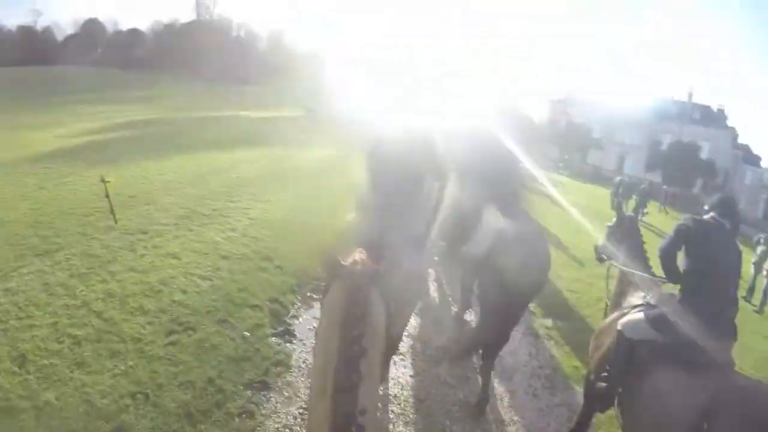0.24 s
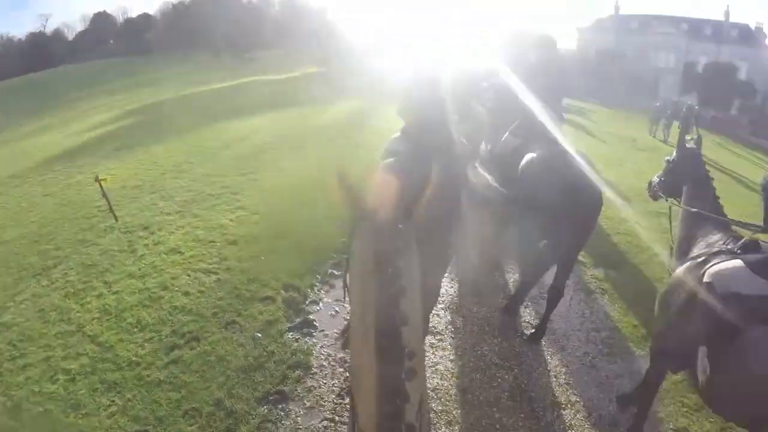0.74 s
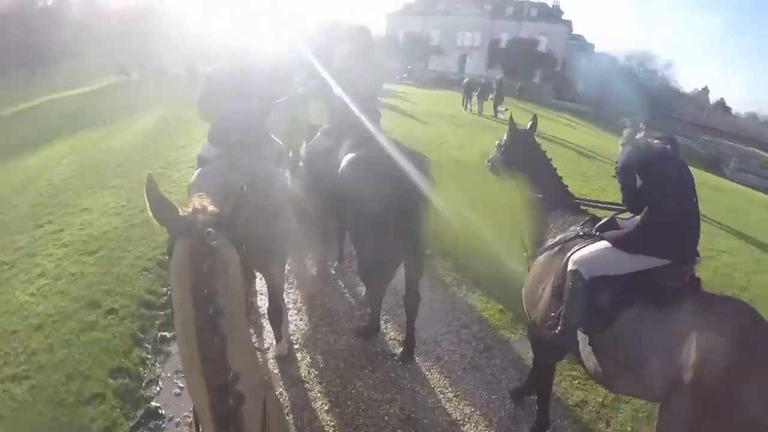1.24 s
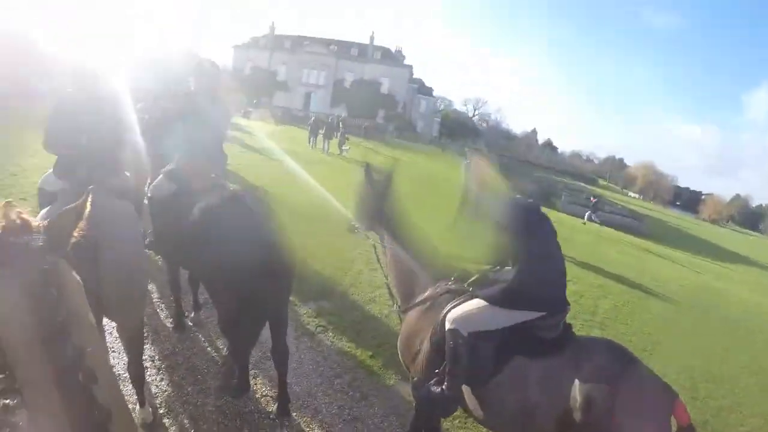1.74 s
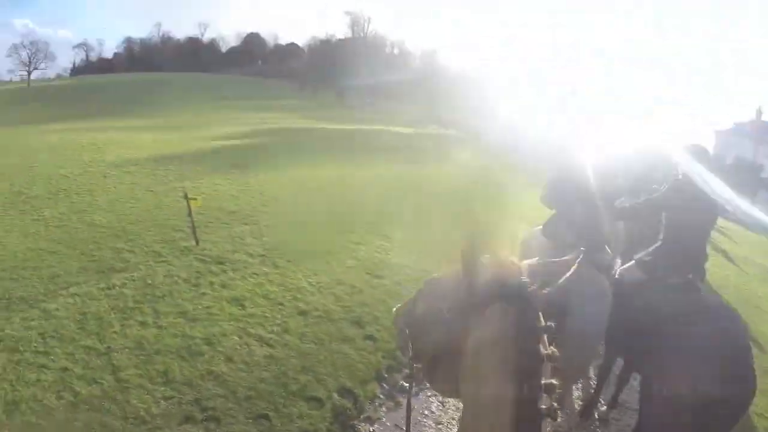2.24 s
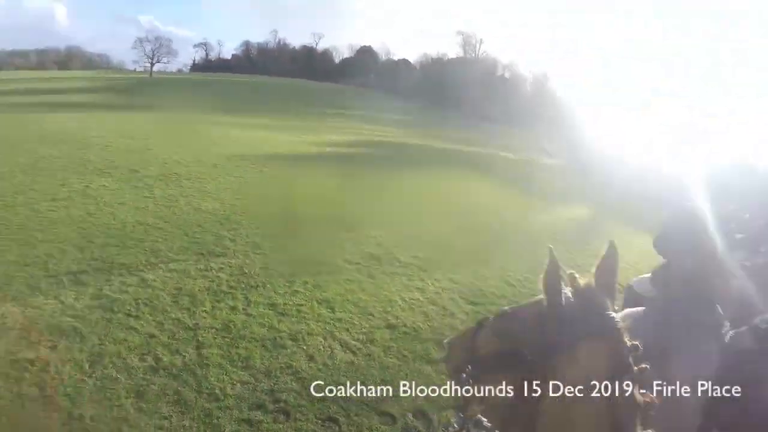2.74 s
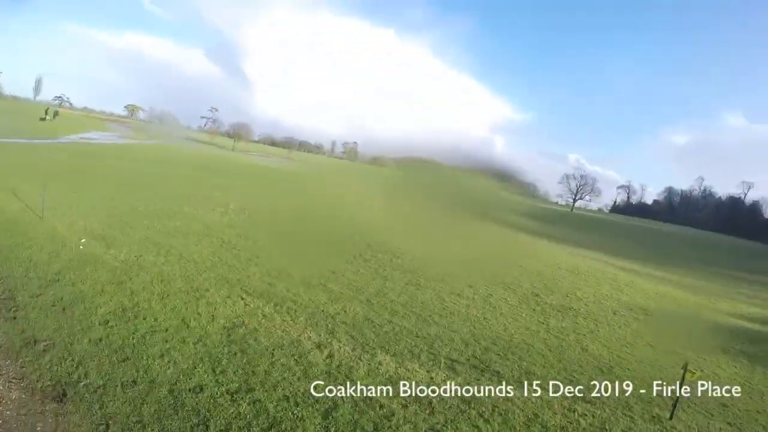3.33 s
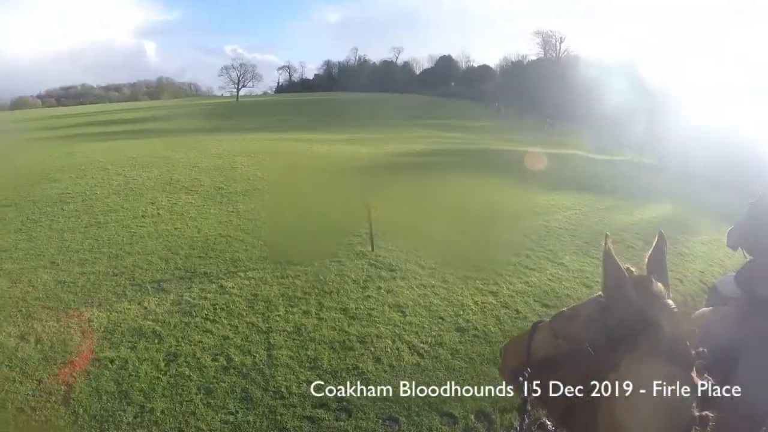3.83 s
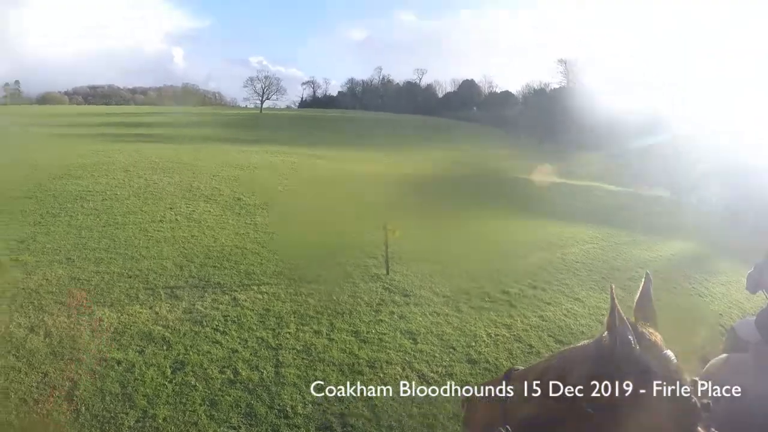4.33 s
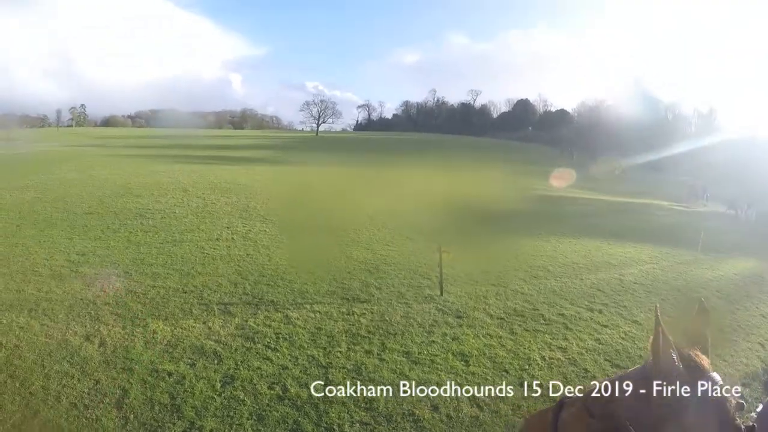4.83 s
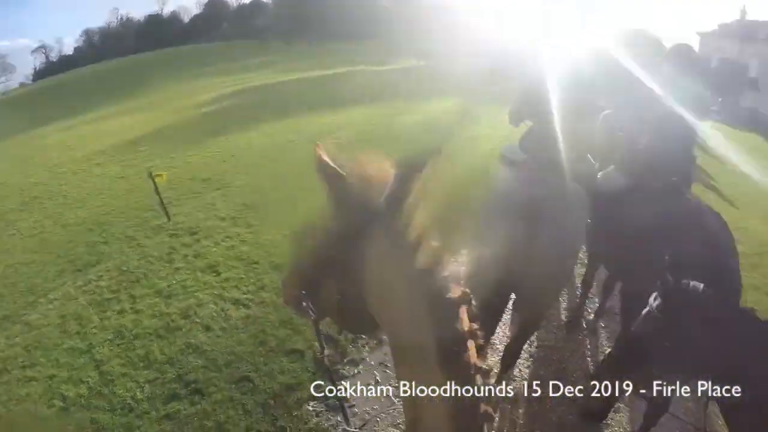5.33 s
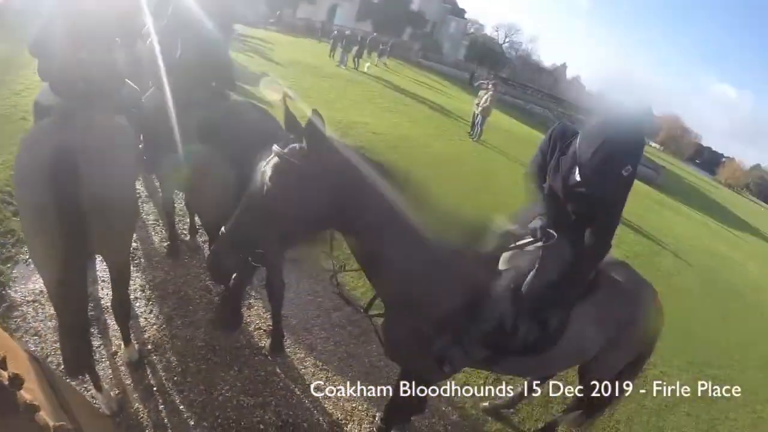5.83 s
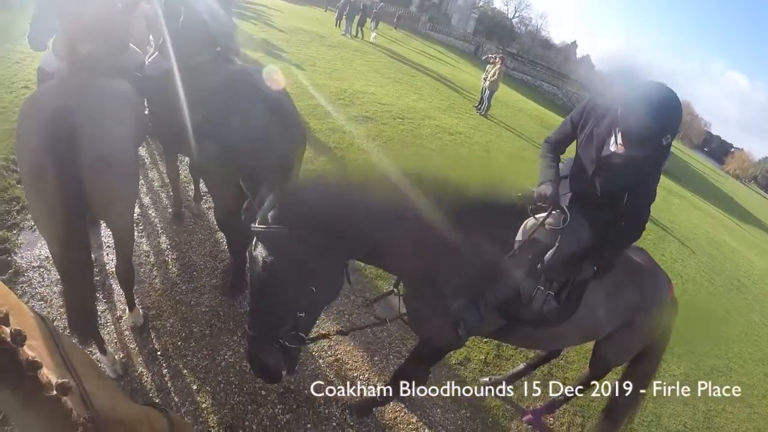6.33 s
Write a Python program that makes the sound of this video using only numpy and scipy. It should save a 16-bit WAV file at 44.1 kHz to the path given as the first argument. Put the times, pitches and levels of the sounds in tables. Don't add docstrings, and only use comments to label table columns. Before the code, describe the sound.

Close gravel crunching and bright stone clinks, a loud hollow thump near the start, then sparse hoof scrapes over low wind buffeting and faint hiss.

```python
import sys
import numpy as np
from scipy import signal
from scipy.fft import rfft, irfft
from scipy.io import wavfile
from scipy.ndimage import uniform_filter1d

SR = 44100
rng = np.random.default_rng(int(sys.argv[2]) if len(sys.argv) > 2 else 0)


def gain_from_db(level_db):
    decades = np.asarray(level_db, float) / 20
    return 10 ** decades


def store_pcm(level_fs):
    pcm = np.round(np.clip(level_fs, -1, 1) * 32767).astype(np.int16)
    wavfile.write(sys.argv[1], SR, np.atleast_2d(pcm).T)


N = 290220

# time in seconds, crunch level in dB.
GRAVEL_CURVE = [(0.0, -46.5), (0.2, -56), (0.42, -55.5), (0.88, -44), (1.34, -58.5), (1.74, -55),
                (1.91, -63.5), (2.71, -63.5), (2.91, -60.5), (3.08, -61.5), (3.33, -67.5), (3.66, -75),
                (4.56, -74.5), (4.93, -66.5), (5.22, -61), (5.48, -59), (6.05, -65), (6.58, -64.5)]
# start in seconds, level in dB, dull part in dB re that,
# length in seconds.
GRINDS = [(0.286, -47, -2, 0.037), (0.409, -42, -3.5, 0.077), (0.622, -42, -2.5, 0.017),
          (1.005, -47.5, -1.5, 0.035), (1.131, -56, -10, .01), (1.236, -55.5, 4.5, 0.049),
          (1.476, -65.5, 10, 0.065), (1.754, -45.5, 0.5, 0.023), (1.966, -55.5, 1, 0.0099),
          (2.111, -68.5, 13, .01), (2.279, -57.5, 0.5, 0.051), (2.356, -58, 0.5, 0.06),
          (2.716, -51.5, -2.5, 0.034), (2.846, -57, 2, 0.022), (2.988, -55, 0.5, 0.036),
          (3.397, -57.5, -1, 0.041), (3.529, -58.5, -0.5, 0.036), (4.127, -62.5, -4, 0.049),
          (4.574, -68.5, 5.5, 0.064), (4.646, -60, -0.5, 0.027), (4.835, -60, -3.5, 0.022),
          (5.054, -65, -6, 0.035), (5.365, -49.5, -2, 0.016), (5.465, -59, -2, .021),
          (5.574, -58.5, -4, 0.026), (5.754, -42.5, -7.5, 0.012), (6.041, -60, -6.5, .012),
          (6.308, -58.5, -12, .023)]
# start in seconds, level in dB, bright part in dB re that,
# length in seconds.
SLIDES = [(0.025, -59, -23, 0.046), (0.122, -49, -10, 0.073), (.228, -52.5, -6.5, 0.012),
          (.339, -52, -10, 0.02), (0.573, -60, -14, 0.023), (0.668, -45.5, -15, 0.079),
          (0.735, -50.5, 2.5, .008), (0.936, -41.5, -9, 0.039), (1.166, -51, -7.5, 0.032),
          (1.348, -48, -9.5, .011), (1.381, -49.5, -10.5, 0.034), (1.775, -52, -26, 0.034),
          (1.827, -57.5, -4, 0.057), (1.988, -59, -3.5, 0.015), (2.622, -48.5, -12, .01),
          (2.91, -59, -26, 0.016), (3.176, -62.5, 5, 0.022), (3.233, -51.5, -13.5, 0.022),
          (3.364, -62, -2, 0.0099), (3.855, -69, 0, 0.0086), (3.909, -59, -25, 0.0094),
          (4.283, -62, -23, .018), (4.508, -52, -7.5, 0.039), (4.757, -59, -23, .012),
          (5.039, -56, -11.5, 0.05), (5.252, -52.5, -8, 0.088), (5.805, -56.5, -16, 0.026),
          (6.195, -75.5, -15.5, .013), (6.38, -62.5, -14, .052), (6.445, -52.5, -15, .007)]
# time in seconds, peak in dB, ring in Hz, broad crack in dB re the ring.
CLINKS = [(0.037, -39.5, 1594, 5), (.057, -39.5, 1670, -0.5), (0.302, -37, 3060, -12),
          (.436, -35, 1660, -5), (.625, -40.5, 1800, -9), (.682, -45, 3170, 9), (.707, -30, 1774, -15),
          (.845, -34, 1780, -14), (0.928, -37, 3240, -10), (.947, -22, 3210, -14), (0.968, -40.5, 1810, -1),
          (1.022, -31.5, 1740, -4), (1.041, -38, 1830, -1), (1.062, -41, 3200, 6), (1.085, -42, 3130, -22),
          (1.252, -42.5, 3290, -6), (1.353, -45, 1900, 2.5), (1.591, -33.5, 3010, -15),
          (1.621, -43, 3020, -28), (1.64, -40.5, 2830, -17), (2.156, -33.5, 3090, -16.5),
          (2.355, -43, 3110, -0.5), (3.415, -65.5, 1705, 16), (4.301, -46, 3260, -14),
          (4.898, -51.5, 2700, -2), (5.753, -37, 2950, 4.5), (5.866, -49.5, 1764, -18),
          (6.265, -58, 2640, -13), (6.452, -40, 1990, -10), (6.574, -48.5, 1690, 9)]
# time in seconds, peak in dB, ring in Hz, bright part in dB.
SNAPS = [(1.14, -45.5, 2980, -7), (1.787, -56.5, 3040, 11.5), (1.801, -60, 2920, 6.5),
         (1.855, -50.5, 5130, 1), (2.155, -53.5, 3070, 1.5), (2.913, -50, 2830, -2.9),
         (2.992, -45.5, 1650, 3.5), (3.243, -49.5, 2870, -5.5), (4.352, -60, 1710, -7),
         (5.369, -41.5, 3190, -11), (5.423, -61, 3120, 7), (5.465, -48, 1730, 0),
         (5.477, -43.5, 1854, -8.5)]
# time in seconds, peak in dB, ring in Hz.
CLOPS = [(.3, -55, 830), (1.14, -48.5, 800), (1.17, -53.5, 362), (1.25, -55, 330), (2.73, -53.5, 1003),
         (3.732, -58.5, 299), (3.81, -60.5, 1190), (4.27, -61.5, 898), (4.66, -60.5, 790),
         (4.845, -61, 886), (5.03, -66, 643), (5.06, -60.5, 636), (5.371, -52, 836), (5.64, -59, 298),
         (5.753, -48.5, 642), (5.754, -47, 902)]
# frequency in Hz, level in dB per Hz.
STONE_COLOUR = [(300, -30), (550, -23.5), (1050, -8), (1400, -4.5), (2300, -1), (4500, -9.5), (6000, -13),
                (8000, -10), (10500, -22), (15000, -34), (15600, -73.5)]
# frequency in Hz, width in Hz, boost in dB.
CAVITY = [(1674, 140, 10), (3130, 430, 10.5), (3940, 130, 5.5), (5380, 400, 6.5), (7100, 1100, 8),
          (10300, 1200, 9)]
RANGE_EDGES = [500, 1350, 2100, 5400, 16500]
# time in seconds, level in dB, hardness in Hz.
KNOCKS = [
    (0.8067, -9, 5946),
    (0.8150, -36, 700),
    (.9465, -52, 1500),
    (.952, -60, 400),
]
# frequency in Hz, level in dB, 60 dB decay in seconds.
SHELL_MODES = [(188, -0.5, 0.068), (330, -5, 0.045), (537, -16.5, 0.012), (751, -15, 0.054),
               (1068, 1.5, 0.013), (1219, 2, 0.011), (1700, -8, 0.026), (1924, -12, 0.022),
               (2320, -11, 0.028)]
# frequency in Hz, level in dB, 60 dB decay in seconds.
MOUNT_MODES = [(32.4, -12.5, 0.35), (72, -10, 0.09), (124.6, -8, .07), (259, -4, .045), (824, -11, .03)]
# time in seconds, buffeting in dB.
BREEZE_CURVE = [(0, -50), (.7, -48.5), (1.2, -68), (1.9, -51), (2.3, -52.5), (3.4, -51.5), (4.2, -53),
                (4.6, -59.5), (5.2, -49), (6.0, -55.5), (6.58, -54)]
# peak in seconds, length in seconds, buffeting in dB, flutter in dB.
GUSTS = [(0.266, .16, -41, -64), (0.45, 0.058, -47, -64), (0.765, 0.057, -52, -55), (0.934, 0.17, -30, -55),
         (1.102, 0.09, -35, -59), (1.305, 0.43, -41.5, -56.5), (1.508, 0.069, -56, -53),
         (1.676, 0.34, -48, -60.5), (1.93, 0.049, -49.5, -75), (2.046, 0.079, -74, -70),
         (2.848, 0.064, -58, -52), (2.959, 0.18, -58, -44), (3.05, 0.035, -49, -51),
         (3.25, 0.073, -56, -64), (3.444, 0.099, -53.5, -62.5), (3.606, .08, -61, -57.5),
         (3.697, 0.12, -42.5, -55.5), (4.152, 0.11, -67.5, -65.5), (4.274, 0.11, -53.5, -76.5),
         (4.597, 0.19, -85, -69.5), (5.121, 0.12, -55.5, -80), (5.306, 0.18, -45.5, -91.5),
         (5.713, 0.16, -48, -64), (6.28, 0.068, -58, -92), (6.55, 0.057, -62, -80)]
# frequency in Hz, level in dB per Hz.
HISS_COLOUR = [(88, -25.5), (150, -7), (235, -9.5), (420, -12.5), (920, -14), (1400, -13), (2300, -10.5),
               (3800, -20.5), (14000, -31), (15200, -37.5), (15600, -77.5)]
# from this time in seconds, first tick in seconds.
TICK_PHASES = [
    (0, .010),
    (3.727, .030),
]


def gravel():
    crunch_db, = in_time(GRAVEL_CURVE)
    dull_db = -6
    bright_db = -12 + 0.058 * (crunch_db - crunch_db.mean())
    clumps = gain_from_db(1.4 * drift(3.1) + 2.2 * drift(50))
    fine = grains(N, per_s=3200, spread_db=1.5, smooth=0.99)
    crunch = (rms_one(fine) + 0.37 * rms_one(pebbles(per_s=500, cycles=17))) * clumps
    ranges = [rms_one(part) * gain_from_db(1.5 * drift(14)) for part in stone_ranges(crunch)]
    return gain_from_db(crunch_db) * blend(ranges, -1, dull_db, bright_db)


def pebbles(per_s, cycles, count=16):
    taps = grains(N, per_s, spread_db=3.5, smooth=0)
    size_of_tap = rng.integers(0, count, N)
    out = np.zeros(N)
    for size, hz in enumerate(np.geomspace(700, 9500, count)):
        out += ring(taps * (size_of_tap == size), hz, cycles / hz) * np.sqrt(hz)
    return out


def scuffs():
    out, t = np.zeros(N + SR), np.arange(SR // 5) / SR
    rows = [(s, db, -1 + 0.2 * dull_db, dull_db, -11, length) for s, db, dull_db, length in GRINDS]
    rows += [(s, db, -6, -15.5, bright_db, length) for s, db, bright_db, length in SLIDES]
    showers = grains((len(rows), len(t)), per_s=5000, spread_db=4.5, smooth=0.62)
    uneven = 8 * uniform_filter1d(rng.standard_normal(showers.shape), size=64)
    for (s, db, lower_db, dull_db, bright_db, length), shower, lumps in zip(rows, showers, uneven):
        share = t / np.clip(length, 0.004, 0.09)
        weight = np.minimum(share / 0.15, 1) * np.exp(-np.maximum(share - 0.55, 0) / 0.45)
        weight_rms = np.sqrt(np.mean(weight ** 2))
        grinding = shower * weight * gain_from_db(2.5 * lumps)
        ranges = [rms_one(part) * weight_rms for part in stone_ranges(grinding)]
        place(out, s, gain_from_db(db) * blend(ranges, lower_db, dull_db, bright_db))
    return out[:N]


def clinks():
    out, t = np.zeros(N + SR), np.arange(SR // 10) / SR
    rows = [(s, db, hz, crack_db, crack_db - 13.5) for s, db, hz, crack_db in CLINKS]
    rows += [(s, db, hz, 2, bright_db + 9) for s, db, hz, bright_db in SNAPS]
    contacts = rng.standard_normal((len(rows), len(t)))
    strike = (t == 0) * 1.0
    for (s, db, hz, crack_db, bright_db), noise in zip(rows, contacts):
        crack = stone_ranges(noise * np.exp(-t / 0.0028))
        dull, lower, upper, bright = [part / np.abs(part).max() for part in crack]
        tone = ring(strike, hz - 110, 0.032) - 0.8 * ring(strike, hz + 110, 0.022)
        hit = tone / np.abs(tone).max()
        hit = hit + gain_from_db(crack_db) * (dull + lower + upper) + gain_from_db(bright_db) * bright
        place(out, s, gain_from_db(db) * hit)
    return out[:N]


def clops():
    out, t = np.zeros(N + SR), np.arange(SR // 10) / SR
    strike, t60_s = (t == 0) * 1.0, 0.062
    for s, db, hz in CLOPS:
        tone = ring(strike, hz * 0.97, t60_s) - 0.7 * ring(strike, hz * 1.12, t60_s * 0.4)
        place(out, s, gain_from_db(db) * tone / np.abs(tone).max())
    return out[:N]


def drag():
    scrape = rms_one(band(grains(N, per_s=1700, spread_db=3.5, smooth=0.87), 1900, 2860))
    swell = gust(np.arange(N) / SR, peak=3.115, length=1)
    return gain_from_db(-64 + 2 * drift(20)) * swell * scrape


def knock():
    out, build_up_s = np.zeros(N), 0.002
    for s, db, hard_hz in KNOCKS:
        click = np.zeros(N)
        click[round(s * SR)] = -gain_from_db(db)
        softening = signal.butter(1, hard_hz, fs=SR, output="sos")
        click = signal.sosfilt(softening, click) * SR / (2 * np.pi * hard_hz)
        for hz, level_db, t60 in SHELL_MODES + MOUNT_MODES:
            lag = round(SR * build_up_s * (hz < 700))
            push = -1 if lag else 1
            out += push * gain_from_db(level_db) * ring(np.roll(click, lag), hz, t60)
        out += gain_from_db(-2.5) * band(click, 2000, 14000)
    return out


def wind():
    t = np.arange(N) / SR
    breeze = gain_from_db(in_time(BREEZE_CURVE)[0])
    push, flutter = breeze.copy(), gain_from_db(-23.5) * breeze
    for peak, length, push_db, flutter_db in GUSTS:
        swell = gust(t, peak, length)
        push += gain_from_db(push_db) * swell
        flutter += gain_from_db(flutter_db) * swell
    buffet = rms_one(band(rng.standard_normal(N + SR), 18, 48, order=3)[SR:])
    eddies = band(rng.standard_normal(N + SR), 65, 140)
    eddies = eddies + 0.11 * band(rng.standard_normal(N + SR), 140, 260, order=4)
    return push * buffet + flutter * gain_from_db(1.5 * drift(9)) * rms_one(eddies[SR:])


def gust(t, peak, length):
    rise = 0.44
    side = np.where(t < peak, rise, 1 - rise) * max(length, 0.02)
    return np.exp(-2 * ((t - peak) / side) ** 2)


def electronics():
    frame_hz, whine_hz, tick_s = 24, 8560, 0.009
    t = np.arange(N) / SR
    weak_cavity = np.array(CAVITY[:2]) * [1, 1, 0.6]
    hiss = signal.fftconvolve(rng.standard_normal(N + SR), response(HISS_COLOUR, weak_cavity))
    hiss = rms_one(hiss[SR:N + SR])
    first = np.where(t < TICK_PHASES[1][0], TICK_PHASES[0][1], TICK_PHASES[1][1])
    from_tick = ((t - first) * frame_hz + 0.5) % 1 - 0.5
    gate = np.exp(-(2 * from_tick / frame_hz / tick_s) ** 2)
    ticks = gate * np.sin(2 * np.pi * whine_hz * t)
    return gain_from_db(-67.5 + 1.4 * drift(3.7)) * hiss + gain_from_db(-76.5) * ticks


def grains(shape, per_s, spread_db, smooth):
    sizes = gain_from_db(spread_db * np.minimum(rng.exponential(1, shape), 5)) * rng.choice([-1, 1], shape)
    impacts = sizes * (rng.random(shape) < per_s / SR)
    return rms_one(impacts) + smooth * rng.standard_normal(shape)


def stone_ranges(x):
    x = signal.fftconvolve(x, response(STONE_COLOUR, CAVITY))[:len(x)]
    borders = zip(RANGE_EDGES, RANGE_EDGES[1:], [2, 2, 2, 1])
    return [band(x, low, high, order) for low, high, order in borders]


def blend(ranges, lower_db, dull_db, bright_db):
    dull, lower, upper, bright = ranges
    return upper + gain_from_db(lower_db) * lower + gain_from_db(dull_db) * dull + gain_from_db(bright_db) * bright


def response(spectrum, peaks, size=4096):
    hz = np.maximum(np.arange(size // 2 + 1) * SR / size, 20)
    corner_hz, corner_db = np.transpose(spectrum)
    db = np.interp(np.log(hz), np.log(corner_hz), corner_db)
    for centre, width, top_db in peaks:
        db = db + top_db / (1 + (2 * (hz - centre) / width) ** 2)
    cepstrum = irfft(np.log(gain_from_db(db)))
    cepstrum[1:size // 2] *= 2
    cepstrum[size // 2 + 1:] = 0
    return irfft(np.exp(rfft(cepstrum)))[:size // 2]


def ring(clicks, hz, t60):
    r, w = gain_from_db(-60 / (t60 * SR)), 2 * np.pi * hz / SR
    return signal.lfilter([0, np.sin(w)], [1, -2 * r * np.cos(w), r * r], clicks + 1e-18)


def drift(rate):
    r = np.exp(-2 * np.pi * rate / SR)
    return rms_one(signal.lfilter([1], [1, -2 * r, r * r], rng.standard_normal(N + SR))[SR:])


def band(x, low_hz, high_hz, order=2):
    return signal.sosfilt(signal.butter(order, [low_hz, high_hz], "band", fs=SR, output="sos"), x)


def in_time(rows):
    s, *columns = np.transpose(rows)
    return [np.interp(np.arange(N) / SR, s, column) for column in columns]


def rms_one(x):
    return x / np.sqrt(np.mean(x ** 2) + 1e-20)


def place(out, start_s, sound):
    start = round(start_s * SR)
    out[start:start + len(sound)] += sound


def scene():
    close = scuffs() + clinks()
    close = close + gain_from_db(2.5) * band(close, 11000, 16000)
    hooves = gravel() + close + clops() + drag()
    return (hooves + knock() + wind() + electronics())[None]


def low_pass(x):
    return signal.sosfilt(signal.butter(12, 16430, fs=SR, output="sos"), x)


def record(dry):
    ceiling = 0.395
    mix = dry / (1 + (np.abs(dry) / ceiling) ** 6) ** (1 / 6)
    return low_pass(mix)


dry = scene()
out = record(dry)
store_pcm(out)
```